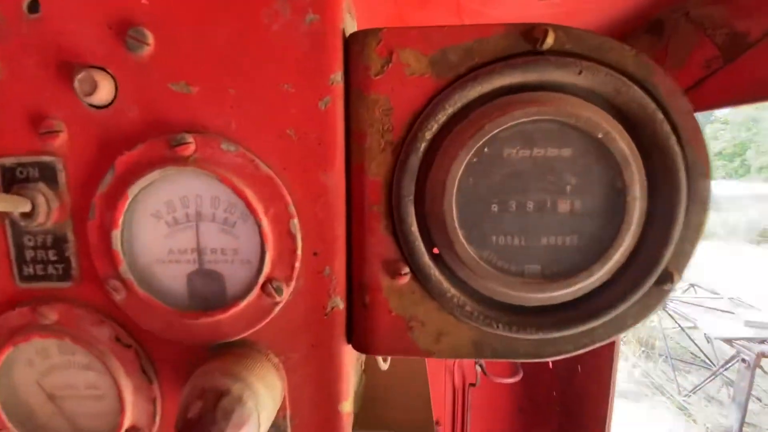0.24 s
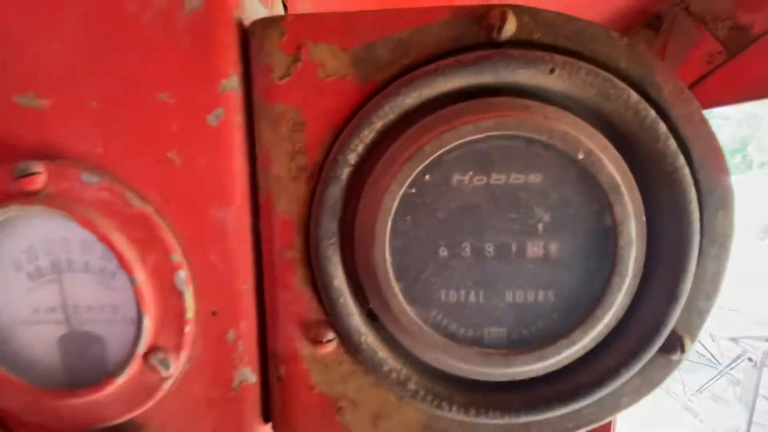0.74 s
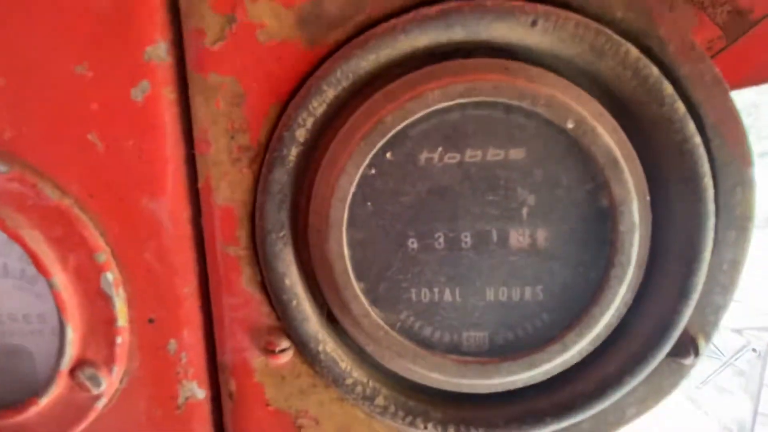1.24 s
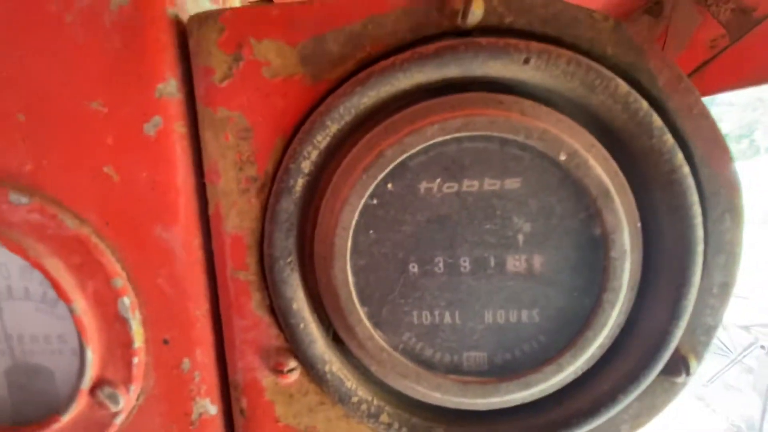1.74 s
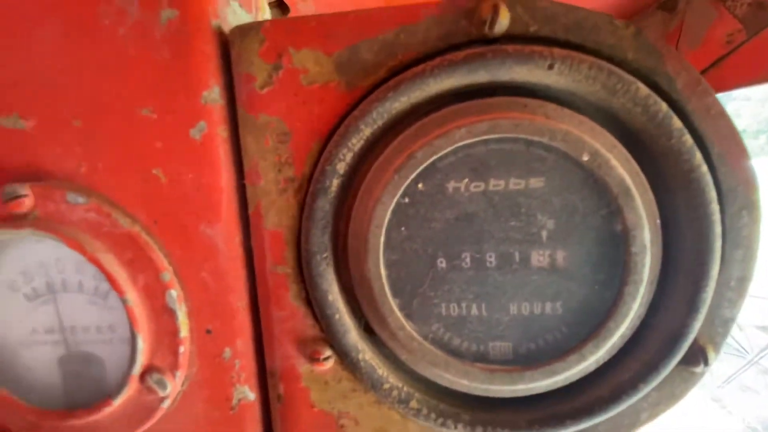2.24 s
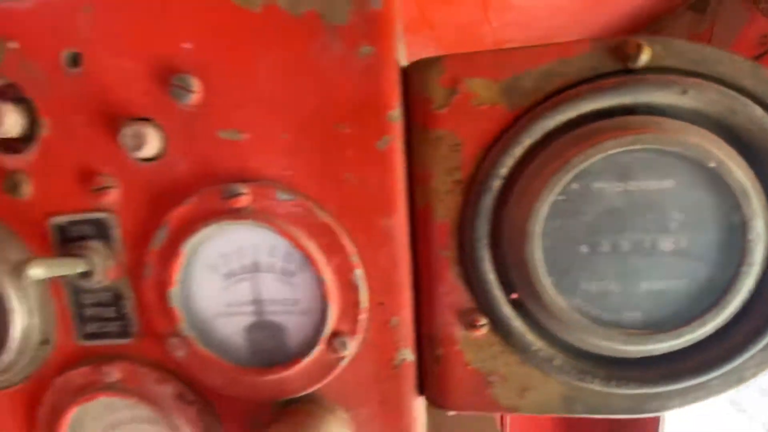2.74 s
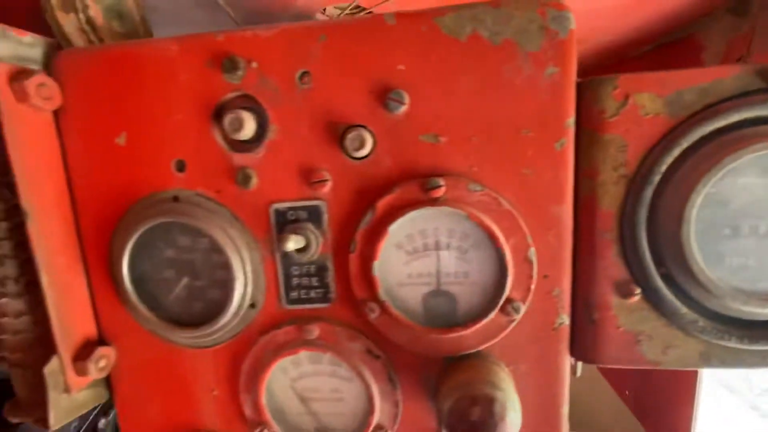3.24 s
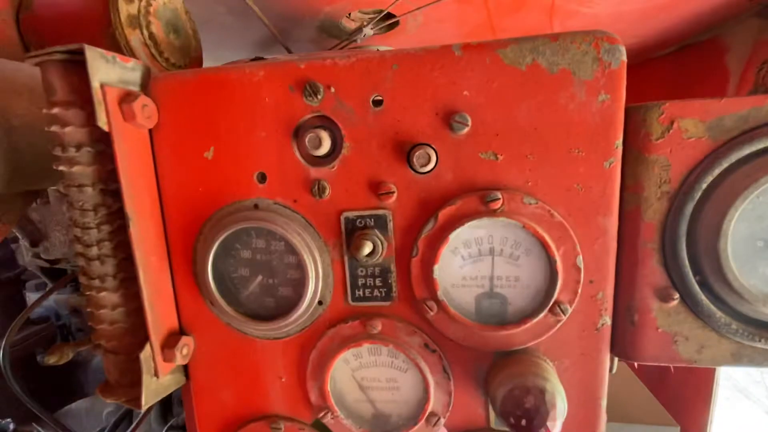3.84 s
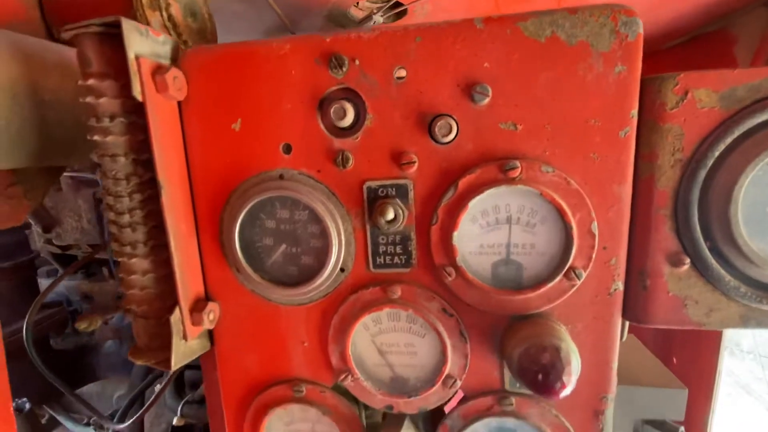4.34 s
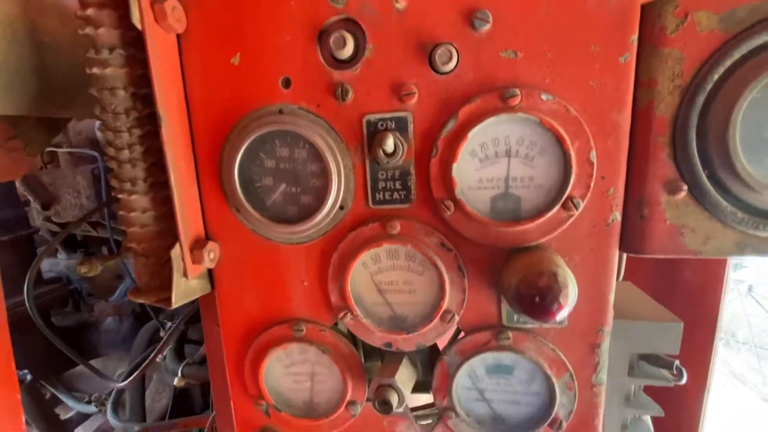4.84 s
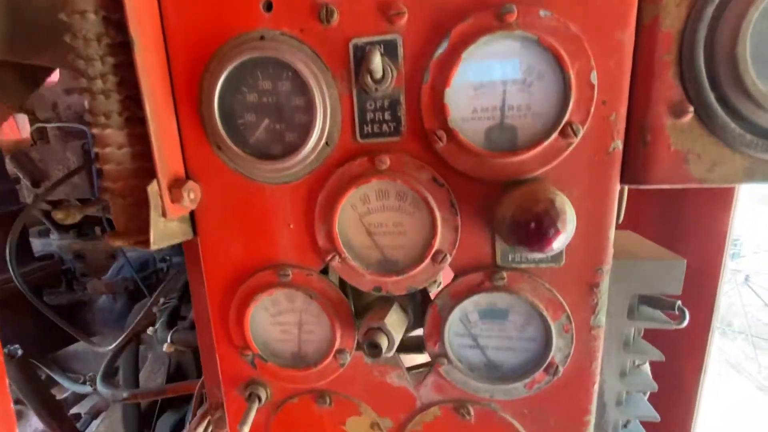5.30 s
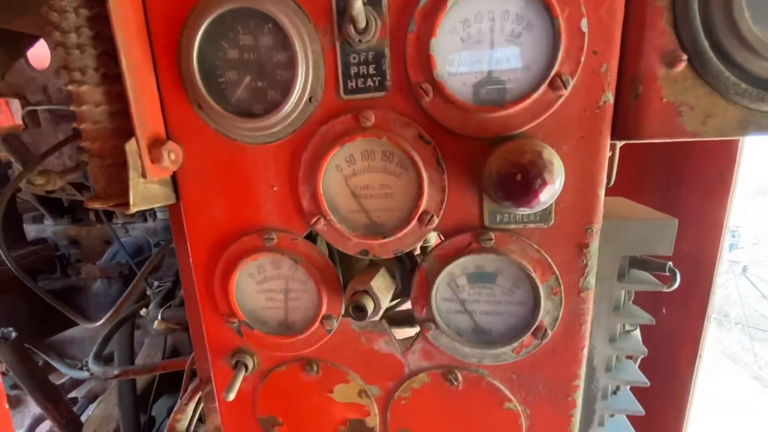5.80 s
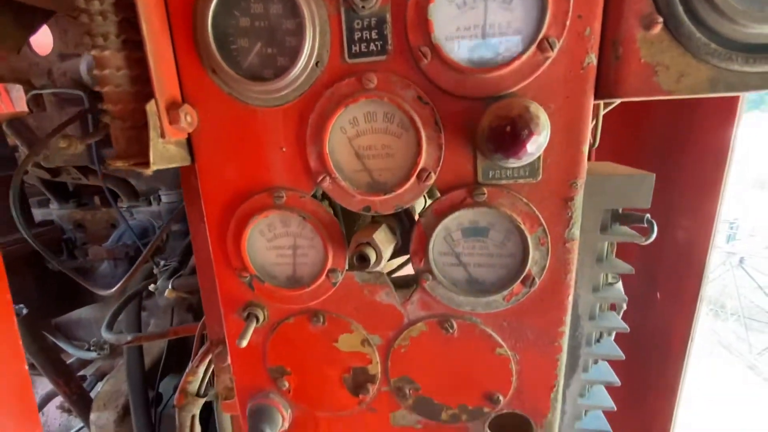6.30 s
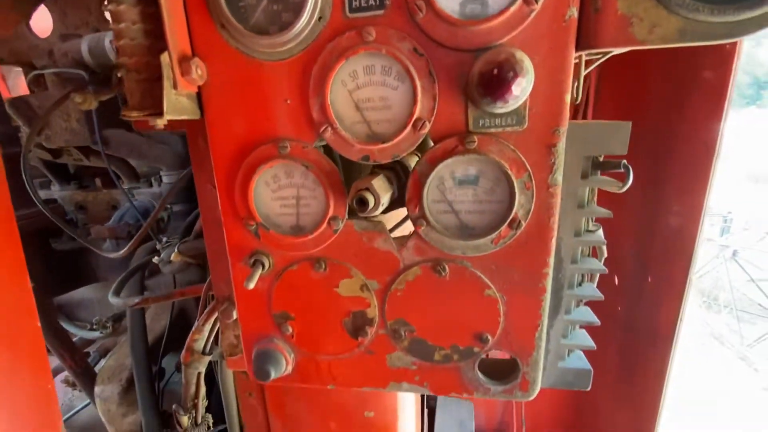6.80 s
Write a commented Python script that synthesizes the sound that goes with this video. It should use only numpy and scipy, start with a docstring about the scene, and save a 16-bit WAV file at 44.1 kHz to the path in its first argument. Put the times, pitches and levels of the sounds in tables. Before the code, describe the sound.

A four-cylinder diesel idles throughout about 7 seconds, already running at the start and cut off still running. It turns at nearly 1200 revolutions a minute, about forty firings a second, fusing into a low, boomy, slightly throbbing hum. Above it sits a bright, steady gear whine of several stacked pitches, strongest from roughly 650 to 1100 hertz, plus mid-range panel drone, broad valve clatter, rushing air, a wavering fan hum and tiny injector ticks. From 0 to 1 s the engine sounds slightly laboured and the microphones lean in to a gauge; the pitch sags a hair until about 3 s. From 2.5 s they back away, the whine partials swelling, fading and generally weakening, while the low thud grows a little. Around 5 to 6.5 s a faint rough rasp comes from the open engine bay. Speed recovers minutely near the end. Close, wide stereo in a reflective steel room.

```python
"""In the steel machinery house of a crane a four-cylinder diesel idles, heard by two hand-held microphones at the gauge panel.
Sums of pure tones make the whining gear, the booming exhaust and the humming fan.
Coloured noise, swelling with the firings, makes the block, the panels, the clatter and rushing air, and a brief rasp.
Short noise bursts make the injector ticks. The microphones drift through standing waves: whine partials swell and fade."""
import sys
import numpy as np
from scipy import signal
from scipy.fft import rfft, irfft, next_fast_len
from scipy.io import wavfile
from scipy.ndimage import uniform_filter1d, map_coordinates

SR = 44100
rng = np.random.default_rng(int(sys.argv[2]) if len(sys.argv) > 2 else 0)


def master_out(mix):
    """Clip the mix to full scale and print it as 16-bit PCM to the path in sys.argv[1]."""
    frames = np.transpose(np.atleast_2d(mix))
    ceiling = np.clip(frames, -1, 1)
    pcm = np.round(ceiling * 32767).astype(np.int16)
    wavfile.write(sys.argv[1], SR, pcm)


N = 311346  # length in samples

# how much louder the left microphone is than the right: (f/Hz, difference/dB)
LEAN = [(60, -3), (160, -0.5), (270, 3), (740, 0.5), (1220, 2), (2000, -1.5), (3300, 0.5), (5500, 2),
        (7300, 0), (9100, -8.5), (12000, 0)]
LEAD_S = 0.00032  # the direct sound reaches the left microphone this much earlier
# one reflection shared by the clatter and the weak whine partials: distance between crests, place of a crest
RING_SPACING_M, RING_CREST_M = 0.29, 0.1


def amp(db):
    """Turn decibels into a gain."""
    return 10 ** (np.asarray(db) / 20)


def unit(x):
    """Scale to an rms (average strength) of 1."""
    return x / np.sqrt(np.mean(np.abs(x) ** 2) + 1e-20)


def along(points, hz):
    """Read a curve of (Hz, value) points on a logarithmic frequency axis."""
    f, v = np.transpose(points)
    return np.interp(np.log(hz + 1), np.log(f + 1), v)


def curves(rows):
    """Draw one value per sample for each column after the time."""
    s, *columns = np.transpose(rows)
    return [np.interp(np.arange(N) / SR, s, column) for column in columns]


def wobble(rate):
    """A smooth random curve with `rate` random points a second."""
    knots = rng.standard_normal(1024)
    coarse = np.linspace(0, N, 4096)
    smooth = map_coordinates(knots, [coarse * rate / SR], mode="wrap")
    return np.interp(np.arange(N), coarse, smooth)


def filtered(x, response):
    """Weight the frequencies of x by response(hz)."""
    m = next_fast_len(N + SR // 2)  # room at the end so that nothing wraps round
    hz = np.fft.rfftfreq(m, 1 / SR)
    return irfft(rfft(x, m) * response(hz), m)[..., :N]


def sine(cycles):
    """A tone of rms 1 from its running count of cycles."""
    return np.sqrt(2) * np.sin(2 * np.pi * cycles)


def mean_hz(cycles):
    """The average frequency of a running count of cycles."""
    return cycles[-1] * SR / N


def panned(lean_db):
    """Left and right gains for a level difference."""
    return amp(np.array([lean_db, -lean_db]).reshape(2, -1) / 2)


def in_house(pair, spectrum):
    """Two unrelated noises become one coloured stereo sound of rms 1, reaching the left microphone first."""
    # how alike the two sides are: (f/Hz, likeness from 0 to 1)
    likeness = [(60, 0.7), (120, 0.94), (200, 0.61), (380, 0.8), (700, 0.11), (1300, 0.32), (2400, 0.16),
                (15000, 0.031)]

    def colour(hz):
        # the angle shares the sound between what both sides have in common and what differs
        angle = np.arccos(np.clip(along(likeness, hz), -1, 1)) / 2
        return amp(along(spectrum, hz)) * [np.cos(angle), np.sin(angle)]

    def arrival(hz):
        return panned(along(LEAN, hz)) * np.exp(1j * np.pi * LEAD_S * np.array([hz, -hz]))

    mid, side = filtered(pair, colour)
    return unit(filtered(np.array([mid + side, mid - side]), arrival))


def standing(cycles, depth, rate, lead=None):
    """A tone at two moving microphones: a direct part plus reflections that drift in strength and phase."""
    field = np.array([1 + depth * (wobble(rate) + 1j * wobble(rate)) for ear in range(2)])
    if lead is None:
        # reflections from all sides hold the left lead to a fraction of a cycle
        hz = SR * np.gradient(cycles)
        lead = 2 * np.pi * np.minimum(LEAD_S * hz, 0.19)
    phase = 2 * np.pi * cycles
    return np.sqrt(2) * np.real(unit(field) * np.exp(1j * np.array([phase + lead, phase])))


def crests(back, reflected, spacing, crest_at):
    """Gain of a sound plus its wall reflection: it is loudest at each crest along the microphones' path."""
    offset = back - np.array(crest_at)[:, None]
    return np.abs(1 + np.clip(reflected, 0, 0.9) * np.exp(2j * np.pi * offset / spacing))


def knocking(cycle, repeat):
    """Noise for dense impacts: a share returns alike in every engine cycle, the rest is new each time."""
    size = 4096
    pattern = signal.resample(rng.standard_normal((2, size)), 4 * size, axis=1)
    place = np.arange(4 * size) / (4 * size)
    same = unit(np.array([np.interp(cycle % 1, place, p) for p in pattern]))
    new = rng.standard_normal((2, N))
    return np.sqrt(repeat) * same + np.sqrt(1 - repeat) * new


def strokes(beats, scatter_db):
    """A random gain held for each stroke, so strokes differ from one another."""
    return amp(scatter_db * rng.standard_normal(512))[np.floor(beats).astype(int)]


def firing(cycle, depth):
    """A rounded swell for each of the four firings, each cylinder with its own strength."""
    # strength of each cylinder's swell, in firing order: [share]
    cylinders = [0.39, 0.54, 0.33, 0.19]
    beats = len(cylinders) * cycle - 0.94 + 0.5  # the swell peaks at 0.94 of the gap between firings
    number = np.floor(beats).astype(int) % len(cylinders)
    strength = np.array(cylinders)[number] * strokes(beats, scatter_db=4.5)
    return unit(1 + depth * strength * np.sin(np.pi * beats) ** 2)


def smeared(cycles, rad_per_hz=0.00017, rate=70):
    """Uneven teeth shake a partial's phase and smear it into a narrow band, wider the higher it lies."""
    return cycles + rad_per_hz * mean_hz(cycles) * wobble(rate) / (2 * np.pi)


def among_walls(k, fade_db, back):
    """Gain of a whine partial: its direct sound changes with distance and beats against wall reflections."""
    # reflections: (multiple of the gear tone, reflected share, distance between crests/m,
    # place of a left crest/m, place of a right crest/m)
    walls = [(3, 0.11, 0.081, 0.055, 0.051), (3, 0.19, 0.54, 0.44, 0.27), (4, 0.08, 0.134, 0.049, 0.058),
             (4, 0.12, 0.48, 0.16, 0.43), (5, 0.4, 0.52, 0.47, 0.268), (5, 0.34, 0.4, 0.23, 0.15),
             (6, 0.51, 0.43, 0.17, 0.21), (6, 0.2, 0.132, 0.08, 0.036), (7, 0.67, 0.82, 0.54, 0.39),
             (7, 0.18, 0.205, 0.17, 0.07), (8, 0.69, 0.248, 0.154, 0.2), (8, 0.73, 0.22, 0.079, 0.091),
             (10, 0.32, 0.22, 0.14, 0.13), (12, 0.67, 0.28, 0.14, 0.12), (13, 0.63, 0.31, 0.16, 0.16),
             (13, 0.44, 0.109, 0.067, 0.062), (14, 0.7, 0.26, 0.114, 0.123), (16, 0.37, 0.43, 0.28, 0.2)]
    echoes = 0
    for partial, share, spacing, *crest_at in walls:
        if partial == k:
            offset = back - np.array(crest_at)[:, None]
            echoes = echoes + share * np.exp(2j * np.pi * offset / spacing)
    return np.abs(amp(-fade_db * back) + echoes)


def gear(turns, back):
    """Meshing teeth whine at many multiples of one tone; each firing jerks the shaft and adds weak sidebands."""
    # strong partials: (multiple of the gear tone, level before walls and shimmer/dB, left-right difference/dB,
    # fade of the direct sound/dB per m, left lead/rad, growth of the lead/rad per cubic m)
    whine = [(3, -27, 4, 23, 1.46, 7), (4, -20.5, 2.5, 30.5, 1.37, 51), (5, -25.5, 5, 22, 0.49, -32),
             (6, -37.5, 10, -10.5, 2.03, 0), (7, -35, 6, 26, 2.5, 19), (8, -38, -3.5, 4, 1.76, 30),
             (10, -45, 1, 3, -1.7, -2), (12, -47.5, 1, 0, 0.2, 0), (13, -49.5, -3, -4, -0.5, -55),
             (14, -51.5, -3, -4, -1.5, -45), (16, -51.5, 0, 7, 0.5, 0)]
    # weak partials: (multiple of the gear tone, level relative to one another/dB)
    overtones = [(1, -53), (2, -54), (9, -51.5), (11, -53), (15, -77), (17, -60.5), (19, -59), (22, -59)]
    level_db, weak_level_db = 0.03, 1  # added to the strong and to the weak partials
    shimmer_db, flicker_db = 0.15, 3.9  # level unrest: strong partials (per multiple), weak partials
    jerk_rad, jitter_rad = 0.008, 0.029  # mesh swing at the firings (rms), and its random unrest
    unrest = (jerk_rad * sine(2 * turns) + jitter_rad * wobble(30)) / (2 * np.pi)
    mesh = 11.183 * turns + unrest  # gear tone cycles per crank turn
    out = np.zeros((2, N))
    for k, db, lean_db, fade_db, lead, lead_growth in whine:
        # the higher the partial, the more it shimmers
        gain = amp(level_db + db + shimmer_db * k * wobble(24)) * panned(lean_db)
        cycles = smeared(k * mesh) + rng.random()
        tone = standing(cycles, depth=0.0038 * k, rate=2.22, lead=lead + lead_growth * back ** 3)
        out += gain * among_walls(k, fade_db, back) * tone
    reflection = crests(back, 0.25, RING_SPACING_M, [RING_CREST_M])
    for k, db in overtones:
        gain = amp(weak_level_db + db + flicker_db * wobble(31)) * reflection
        cycles = smeared(k * mesh) + rng.random()
        out += gain * standing(cycles, depth=0.25, rate=1.9)
    return out * (1 + 0.064 * sine(turns))  # the whine swells once a turn


def exhaust(cycle, load_db):
    """Exhaust and panel hum from multiples of the cycle rate; shorter waves change more from place to place."""
    # partials: (multiple of the four-stroke cycle rate, level before load and wavering/dB)
    boom = [(4, -34.5), (5, -66), (7, -82), (8, -26), (9, -47.5), (11, -48.5), (12, -40.5), (13, -57),
            (14, -47.5), (15, -50.5), (24, -47), (44, -44.5), (52, -45.5), (55, -65), (70, -40), (72, -39),
            (144, -51), (216, -48.5), (222, -53)]
    out = np.zeros((2, N))
    for k, db in boom:
        hz = mean_hz(k * cycle)
        tone = standing(k * cycle, depth=0.55 * hz / 1000, rate=1.362)
        out -= amp(db) * panned(along(LEAN, hz)) * tone
    return out * amp(load_db + 0.5 * wobble(35))


def block(cycle, back, surplus, load_db):
    """The engine block thuds: low noise swelling at each firing, louder with speed, load and backing away."""
    # colour of the thuds before scaling: (f/Hz, level per Hz/dB)
    thud_colour = [(20, -22), (35, -22), (52, -9), (85, 3), (130, -1), (205, -3.5), (255, -1.5), (310, -2),
                   (400, 2.5), (520, 0.5), (750, -3.5), (1200, -2.5), (3000, -104)]
    thuds = knocking(cycle, repeat=0.099) * firing(cycle, depth=0.19)
    # 0.2 dB per rpm above idle, 4 dB per metre back
    level_db = -29 + 0.2 * surplus + load_db / 2 + 4 * back
    return amp(level_db) * in_house(thuds, thud_colour)


def panels(cycle, back, surplus, load_db):
    """The steel panels drone: mid-range noise with the firings, strongest right at the gauge panel."""
    # colour of the drone before scaling: (f/Hz, level per Hz/dB)
    drone_colour = [(200, -43), (450, -37), (620, 9.5), (780, 13), (960, 5.5), (1080, 17.5), (1170, 10),
                    (1280, 9.5), (1500, -17), (3000, -52)]
    # share of the extra drone near the panel: [left microphone, right microphone]
    ears = [1, 0.4]
    drone = knocking(cycle, repeat=0.45) * firing(cycle, depth=0.22) * amp(0.7 * wobble(20))
    # up to 2 dB extra, carrying about 0.061 m
    near_db = 2 * np.array(ears)[:, None] * np.exp(-(back / 0.061) ** 2)
    # 0.2 dB per rpm above idle, 6 dB lost per metre back
    level_db = -29 + 0.2 * surplus + load_db / 2 + near_db - 6 * back
    return amp(level_db) * in_house(drone, drone_colour)


def bursts(pair, depth_db):
    """Loose parts rattle in short bursts: each small patch of time and frequency gets a random level."""
    z = signal.stft(pair, nperseg=256)[2]
    patches = rng.standard_normal(z.shape[1:])
    patches = uniform_filter1d(patches, size=5, axis=0)
    patches = uniform_filter1d(patches, size=4, axis=1)
    return signal.istft(z * amp(depth_db * unit(patches)), nperseg=256)[1][:, :N]


def off_panel(x, back):
    """The panel throws back the upper mids, so they swell and sink as the microphones move."""
    centre_hz, width_hz = 2520, 650
    ring = filtered(x, lambda hz: np.exp(-((hz - centre_hz) / width_hz) ** 2))
    return x + ring * (crests(back, 0.14, RING_SPACING_M, [RING_CREST_M]) - 1)


def clatter(cycle, back, surplus):
    """Injectors and valves clatter in the rush of cooling air: broad noise in bursts, swelling at each firing."""
    # colour of the clatter before scaling: (f/Hz, level per Hz/dB)
    clatter_colour = [(400, -61), (900, 6.5), (1200, -11.5), (1430, 6), (1620, 1), (1730, 2.5), (1860, -2),
                      (2150, 1.5), (2300, -3), (2700, -4.5), (3100, -5.5), (4100, -10.5), (6200, -9.5),
                      (7300, -17), (9200, -18), (11000, -23.5), (12200, -46), (14000, -24.5), (15000, -29)]
    rattle = bursts(knocking(cycle, repeat=0.15) * firing(cycle, depth=0.22), depth_db=1.4)
    # 0.25 dB per rpm above idle, 1.4 dB lost per metre back
    level_db = -29 + 0.25 * surplus - 1.4 * back
    return amp(level_db) * off_panel(in_house(rattle, clatter_colour), back)


def fan(turns, back):
    """The belt-driven fan hums at multiples of its blade rate, slipping a little."""
    # partials: (multiple of the blade rate, level before fading and wavering/dB, left-right difference/dB,
    # fade/dB per m, left lead/rad, share of the waver)
    partials = [(1, -36.5, -5, 12, -0.46, 0), (2, -44.5, 3, -13, -1.27, 0.063),
                (3, -38.5, 1, 0, 0.29, 0.87), (4, -43.5, 5.5, -9, 1.84, 0.61), (5, -39.5, -11, 29, 1.2, 0),
                (6, -48.5, -4, -25, 1.3, 0.25)]
    # the hum wavers: (t/s, level change at full share/dB)
    waver = [(0, 1), (.25, 5.5), (.55, -6), (1.15, 10), (1.45, -7), (1.8, -6), (2.15, 3.5), (2.6, -6),
             (3, 4.5), (3.7, 1), (4.6, 3), (5, -1), (5.5, -0.5), (5.75, 0), (6.3, 2.5), (7.06, -0.5)]
    blades = 8.628 * turns + 0.042 * wobble(3.018)  # blade passes per crank turn, plus slip in passes
    waver_db, = curves(waver)
    out = np.zeros((2, N))
    for k, db, lean_db, fade_db, lead, waver_share in partials:
        level_db = db - fade_db * back + waver_share * waver_db + 1.76 * wobble(9)
        tone = standing(k * blades + rng.random(), depth=0.12, rate=1.68, lead=lead)
        out += amp(level_db) * panned(lean_db) * tone
    return out


def engine_bay(cycle, back):
    """A rough rasp of the valve gear, mostly repeating each cycle, comes through beside the open engine bay."""
    # colour of the rasp before scaling: (f/Hz, level per Hz/dB)
    bay_colour = [(700, -40), (1150, -29), (1330, 1), (1450, 9), (1600, 2), (2100, -36)]
    gap_at_m, reach_m = 0.33, 0.068  # where the microphones pass the gap, and over what stretch
    rasp = knocking(cycle, repeat=0.85) * firing(cycle, depth=0.43)
    nearness = np.exp(-((back - gap_at_m) / reach_m) ** 2)
    return amp(-36) * nearness * in_house(rasp, bay_colour)


def injectors(cycle):
    """Each injector snaps shut once a cycle with a short metallic tick: noise that dies away quickly."""
    # colour of the ring before scaling: (f/Hz, level per Hz/dB)
    tick_colour = [(700, -21), (1350, 17), (1800, -8), (2400, 7), (4000, -17), (6000, -12), (9500, -18),
                   (12000, -47)]
    # strength of each injector's tick, in firing order: [share]
    strengths = [1, 1, 0.39, 0.82]
    decay_s = 0.0045
    beats = len(strengths) * cycle - 0.6  # it ticks at 0.6 of the gap between firings
    age_s = beats % 1 / (np.gradient(beats) * SR)  # time since the last tick
    number = np.floor(beats).astype(int) % len(strengths)
    strength = np.array(strengths)[number] * strokes(beats, scatter_db=1.5)
    ticks = strength * np.exp(-age_s / decay_s) * rng.standard_normal((2, N))
    return amp(-39.5) * in_house(ticks, tick_colour)


def scene():
    """Everything turns with the crankshaft (one four-stroke cycle takes two turns), heard along the path."""
    # the governor hunts a little: (t/s, crankshaft speed/rpm)
    speed = [(0, 1184.3), (.4, 1182.2), (.72, 1185.1), (1.2, 1182.3), (1.6, 1181), (2.5, 1181.3),
             (2.75, 1180), (3.1, 1181.3), (3.5, 1180.2), (4.2, 1181), (4.65, 1183), (4.9, 1181.8),
             (5.3, 1183.5), (5.7, 1181.6), (6.05, 1180.5), (6.45, 1182), (6.6, 1184.8), (7.06, 1184.3)]
    # the microphones lean in to a gauge, then back away: (t/s, distance back from the closest point/m)
    path = [(0, .065), (.45, .035), (.9, .015), (2.3, .027), (2.75, .05), (3.35, .18), (4.2, .219),
            (5, .286), (6, .358), (7.06, .446)]
    # the engine labours a little at first: (t/s, level change/dB)
    load = [(0, 3), (.7, 1.5), (1.5, 1), (2.6, -0.5), (5, 0.24), (7.06, -1)]
    (rpm,), (back,), (load_db,) = curves(speed), curves(path), curves(load)
    turns = np.cumsum(rpm) / 60 / SR
    cycle = turns / 2
    surplus = rpm - 1182  # rpm above idle
    engine = gear(turns, back) + exhaust(cycle, load_db)
    body = block(cycle, back, surplus, load_db) + panels(cycle, back, surplus, load_db)
    details = clatter(cycle, back, surplus) + engine_bay(cycle, back) + injectors(cycle)
    return engine + body + details + fan(turns, back)


def record(dry):
    """The sound starts and ends softly; the microphones pass nothing from 15300 Hz up."""
    edges = signal.windows.tukey(N, 0.0004)
    return filtered(dry * edges, lambda hz: hz < 15300)


dry = scene()
out = record(dry)
master_out(out)
```